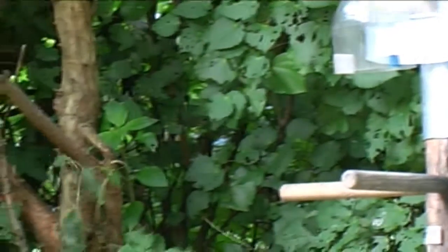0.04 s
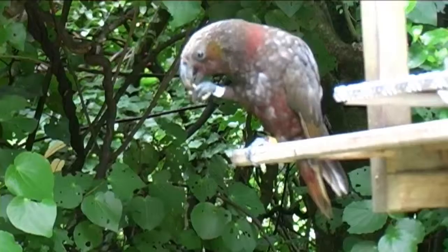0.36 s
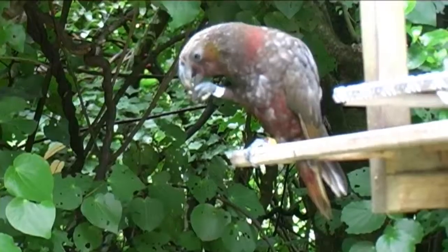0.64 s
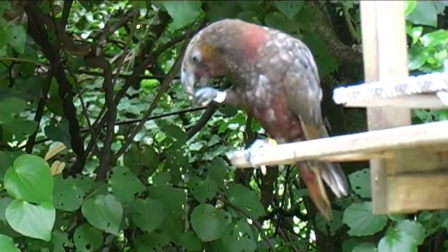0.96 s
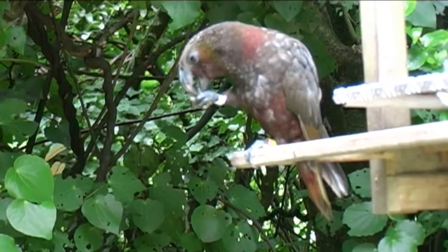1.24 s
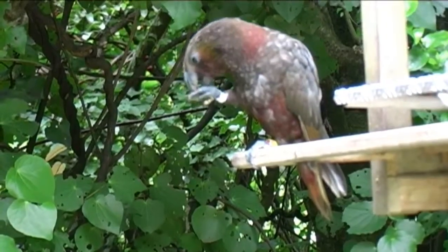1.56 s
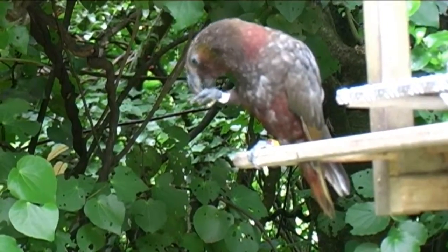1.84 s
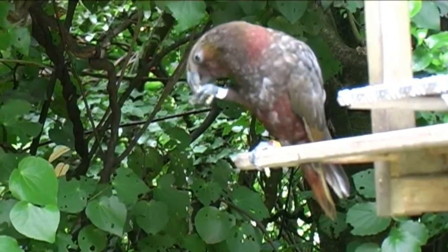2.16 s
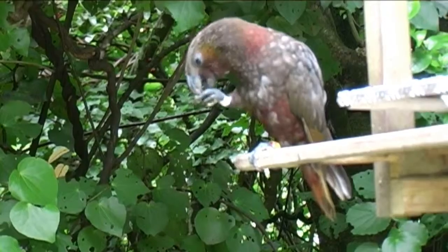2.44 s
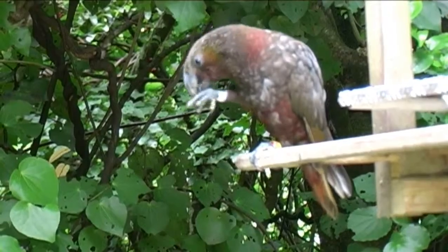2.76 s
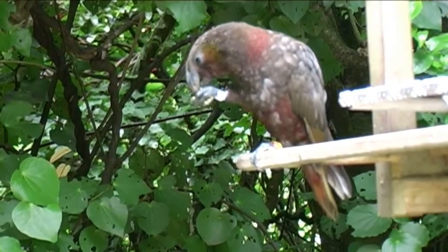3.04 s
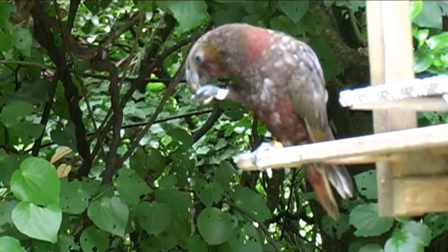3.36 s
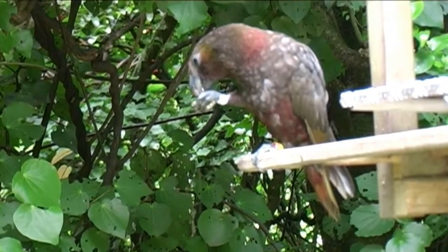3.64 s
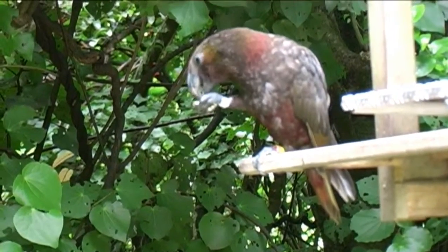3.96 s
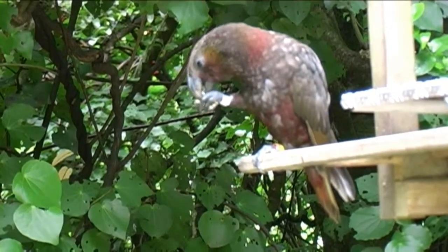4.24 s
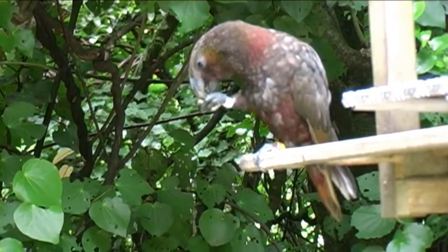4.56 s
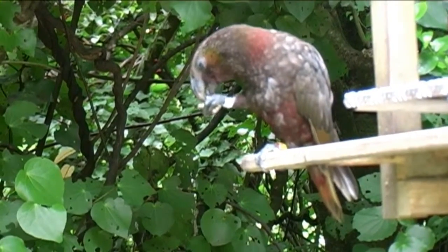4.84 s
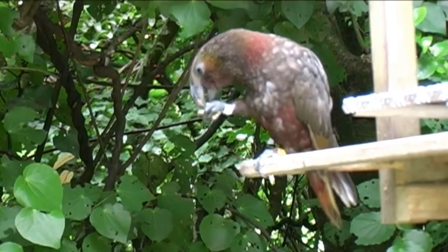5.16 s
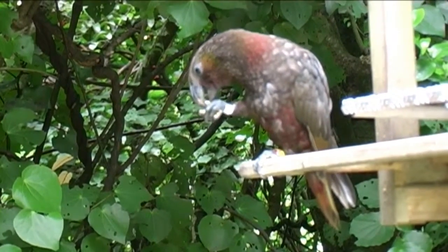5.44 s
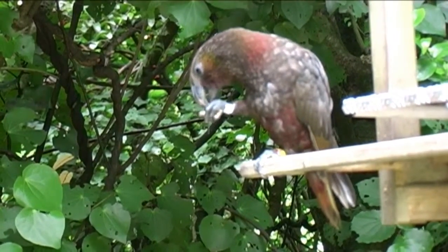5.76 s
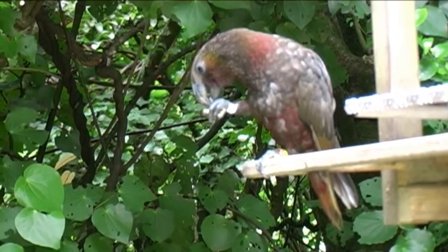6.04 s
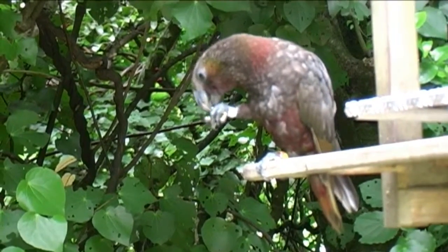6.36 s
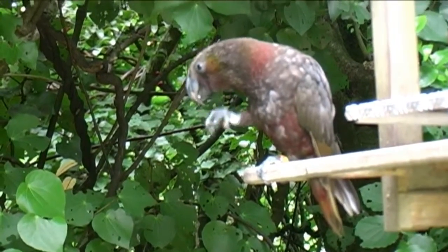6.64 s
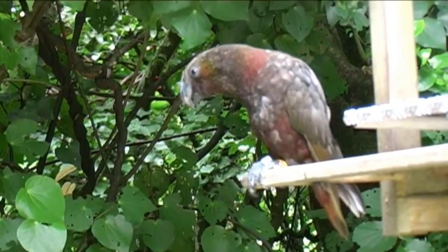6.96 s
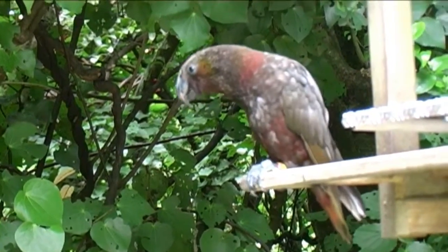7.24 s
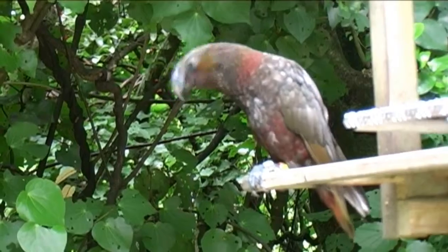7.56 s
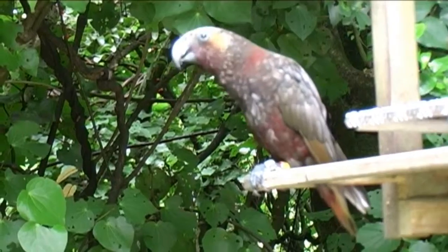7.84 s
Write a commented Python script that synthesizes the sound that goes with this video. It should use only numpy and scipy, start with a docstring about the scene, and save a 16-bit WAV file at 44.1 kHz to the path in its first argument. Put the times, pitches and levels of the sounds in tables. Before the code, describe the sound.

A camera zoom motor buzzes briefly and stops with a small knock. Straight ahead, a parrot nibbles food with scattered dry cracks and tiny ticks. Another bird, to the right, clacks its beak in two evenly paced runs, then gives seven short, loud rasps near the end. Small birds chirp faintly farther off in the dense bush, over the microphone's steady hiss and low hum.

```python
"""Parrot feeding in dense bush

A parrot nibbles food on a feeder; each small dry crack is an impulse that rings its beak.
A hidden bird to the right clacks in two runs, then gives seven loud rasps, pulses of tone and air
shaped by its throat. Others chirp farther off, and leaves and trunks scatter all the birds' sounds.
A camera's zoom motor buzzes at first, and the camera hums and hisses throughout."""
import sys
import numpy as np
from scipy import signal
from scipy.fft import rfft, irfft, next_fast_len
from scipy.io import wavfile
from scipy.ndimage import uniform_filter1d

SR = 44100
rng = np.random.default_rng(int(sys.argv[2]) if len(sys.argv) > 2 else 0)


def int16_out(signal):
    """Quantize to a 16-bit WAV file."""
    q = np.round(np.clip(np.atleast_2d(signal).T, -1, 1) * 32767)
    wavfile.write(sys.argv[1], SR, q.astype(np.int16))


N = 352844
TIME = np.arange(N) / SR

# Spectrum of outdoor air and microphone hiss. Each row: frequency in Hz, relative density in dB.
AIR_COLOUR = [(15, -55), (25, -50), (43, -7.5), (76, -7), (123, -14.5), (153, -6.5), (175, -5.5), (293, -8),
              (516, -10), (887, -11.5), (2110, -18), (4870, -23.5), (10100, -33), (14800, -19),
              (16000, -37)]
# Stereo width of that noise. Each row: frequency in Hz, side minus mid level in dB.
AIR_WIDTH = [(40,-6),(100,-6),(160,-4),(300,-9.5),(1000,-3),(4000,-1),(9000,-5.5),(12000,-1.5),(14000,5.5)]
# Camera hum. Each row: frequency in Hz, mid level in dB, side level in dB.
HUM_TONES = [(113,-62.5,-81),(149.4,-54.5,-43)]
# The zoom motor's hum, overtones and gear tones. Each row: frequency in Hz, level in dB.
ZOOM_TONES = [(85.6,-38),(112.5,-49),(171,-50),(258,-53),(342,-52.5),(540,-62),(750,-55.5),(4300,-61),(4630,-66),(5300,-66),(6230,-67.5)]
# Spectrum of the motor's whirr. Each row: frequency in Hz, relative density in dB.
WHIRR_COLOUR = [(60,-19),(300,0),(800,-3.5),(1600,-8.5),(3000,-9.5),(4500,-23),(6000,-16),(9000,-32),(11500,-20),(13000,-4),(16000,-30)]

# Short arched yelps. Each row: start in seconds, mid-call pitch in Hz, relative level in dB, blur in Hz.
FAR_YELPS = [(.443,1395,-43.5,10),(2.03,1540,-44,290),(2.171,1664,-50,270),(2.783,1494,-47,99),(2.92,1586,-49.5,180)]
# Hoarse churrs. Each row: start and length in seconds, pitch in Hz, relative level in dB.
FAR_CHURRS = [(0.329,0.047,2064,-44),(4.886,.15,2487,-47.2),(5.039,0.089,2500,-50),(5.58,.13,1695,-53.5),(6.417,0.061,1903,-46)]
# Hoarse down-slurs. Each row: start in seconds, first pitch in Hz, relative level in dB, fade in dB/s.
FAR_SLURS = [(.95,4480,-49,14),(4.26,4450,-48,37)]
# Clear glides. Each row: start and length in seconds, first and last pitch in Hz, relative level in dB.
FAR_WHISTLES = [(2.735,0.15,3750,3740,-49.5),(2.827,.14,4120,3760,-52),(5.08,0.047,2970,3420,-50),(5.699,.17,3730,3600,-55),(5.788,.083,3430,2930,-51),(6.162,0.027,2460,2540,-48),(7.951,0.069,2450,1147,-28.5)]
# Upward flicks of a small bird's warble. Each row: time in seconds, top pitch in Hz.
WARBLE_FLICKS = [(2.68,5480),(2.722,5720),(2.769,5500),(2.822,5450)]

# The hidden bird's clacks. Each row: start in seconds, relative level in dB, resonance in Hz.
BEAK_CLACKS = [(.8986,-11,1780),(1.0977,-18,1660),(1.2912,-17,3900),(1.4885,-16.5,5020),(1.6822,-12,5600),(3.653,-12,3950),(3.8484,-18.5,2240),(4.0475,-10.5,1980),(4.2499,-10.5,4420),(4.4546,-18.5,2030),(4.653,-18.5,4730),(7.6114,-21,6540),(7.6485,-17.5,3310),(7.6574,-29,3950),(7.7645,-22,3460),(7.9862,-14.5,6100)]
# Response of its beak. Each row: frequency in Hz, gain in dB.
HIDDEN_BEAK = [(200,-28),(900,-6),(1800,-2),(2700,-1),(4100,2),(5000,0),(6900,2),(8200,-4.5),(10000,-9),(12500,-21),(16000,-41.5)]
# Its rasps. Each row: hiss start, burst start and burst length in seconds, effort in dB,
# mid-burst pitch in Hz, sag in octaves per second, resonance in Hz.
RASP_CALLS = [(6.647,6.6532,0.015,-23,1165,3.6,2260),(6.814,6.825,.02,-20,1276,2.84,2290),(6.983,7.002,.022,-20.5,1046,3.4,3150),(7.163,7.18,.011,-11.5,1031,20,4350),(7.333,7.354,.022,-14.5,1589,7,4440),(7.5047,7.5348,0.0065,-10,1055,3.5,4200),(7.6947,7.718,0.01,-12.2,1014,3.5,3330)]
# Response of its throat. Each row: frequency in Hz, gain in dB.
THROAT_COLOUR = [(300,-42),(650,-10.5),(950,-7),(1500,-3),(2100,1.5),(3100,3),(4200,5),(5200,3),(6300,0.5),(7500,-3),(8600,-8.5),(10000,-19.5),(12000,-19),(15000,-47)]
# Spectrum of the hiss that opens a rasp. Each row: frequency in Hz, relative density in dB.
LEAD_HISS_COLOUR = [(400,-22.5),(1400,-23),(2100,-9.5),(3300,-5),(4500,-3.5),(5500,-5),(7300,-19),(10000,-25),(14000,-38)]
# Wheezes ending the last two rasps. Each row: start and time until fading in seconds, relative level in dB.
END_WHEEZES = [(7.587,.075,-36.5),(7.746,0.031,-30)]

# The parrot cracks its food. Each row: start in seconds, relative level in dB, resonance in Hz.
FOOD_CRACKS = [(.6148,-23.5,4800),(.7095,-23.5,7100),(1.172,-28,7500),(2.1516,-18,6940),(2.3675,-28.5,6500),(3.0792,-13,1180),(3.1557,-28,4530),(3.1952,-18,6940),(4.9761,-25,5200),(5.9612,-25.5,3380),(6.1924,-21,8100),(6.2722,-23,2900),(6.5099,-20,7500)]
# Response of the parrot's beak. Each row: frequency in Hz, gain in dB.
PARROT_BEAK = [(100,-47),(600,-4.5),(1200,-7.5),(2400,-7.5),(4600,-2),(7000,-4.5),(8200,-7.5),(11000,-14),(16000,-20)]


def amp(db):
    """Amplitude grows tenfold for every 20 dB."""
    return 10 ** (np.asarray(db) / 20)


def unit(x):
    """Normalisation to an rms of 1."""
    return x / np.sqrt(np.mean(x ** 2) + 1e-20)


def read(points, hz):
    """Interpolation of a spectrum on a log-frequency axis."""
    f, value = np.transpose(points)
    return np.interp(np.log(hz + 1), np.log(f + 1), value)


def add(mix, s, sound):
    """Superposition: a sound joins the mix at s seconds."""
    part = mix[max(round(s * SR), 0):][:len(sound)]
    part += sound[:len(part)]


def tint(x, points):
    """Filtering by multiplication in the frequency domain."""
    size = next_fast_len(len(x))
    gain = amp(read(points, np.fft.rfftfreq(size, 1 / SR)))
    return irfft(rfft(x, size) * gain, size)[:len(x)]


def noise(points):
    """Stationary Gaussian noise of rms 1 with the given spectrum."""
    return unit(tint(rng.standard_normal(N), points))


def drift(count):
    """Random modulation of about unit size, interpolated between count values."""
    return np.interp(TIME, np.linspace(0, TIME[-1], count), rng.standard_normal(count))


def ring(colour_db, size=1024):
    """Minimum-phase impulse response of a body, from its gain in dB as a function of frequency."""
    log_gain = np.log(amp(colour_db(abs(np.fft.fftfreq(size, 1 / SR)))))
    spectrum = np.exp(np.conj(signal.hilbert(log_gain)))
    return np.fft.ifft(spectrum).real[:size // 2]


def place(x, right_db):
    """Direction by level difference: the right channel gains right_db over the left."""
    gains = amp([[-right_db / 2], [right_db / 2]])
    return x * gains / gains.mean()


def air_and_hum(air_db=-47.07, right_db=1.34, waver_rad=0.16):
    """Broadband air and hiss underlie the camera's hum, which is mostly in antiphase between channels."""
    mid = amp(air_db) * noise(AIR_COLOUR)
    side = amp(air_db) * tint(noise(AIR_COLOUR), AIR_WIDTH)
    for hz, mid_db, side_db in HUM_TONES:
        phase = 2 * np.pi * hz * TIME + waver_rad * drift(count=60)
        mid += np.sqrt(2) * amp(mid_db) * np.sin(phase)
        side += np.sqrt(2) * amp(side_db) * np.cos(phase)
    return place(mid, right_db) + place(side, right_db) * [[1], [-1]]


def zoom_motor(stop_s=.338, whirr_db=-45, knock_db=-37, knock_t60=0.079):
    """Rotating motor and gears give a wavering line spectrum; the stop excites damped modes, a knock."""
    buzz = np.zeros(N)
    for hz, db in ZOOM_TONES:
        waver = .04 * hz / (hz + 800)  # higher tones waver by a larger share of their pitch
        turns = np.cumsum(hz * (1 + waver * drift(count=400))) / SR
        chatter_db = 6 * hz / (hz + 500) * drift(count=700)  # the high gear tones come and go
        buzz += np.sqrt(2) * amp(db + chatter_db) * np.sin(2 * np.pi * turns)
    running = np.clip((stop_s - TIME) / 0.01, 0, 1)
    t = np.maximum(TIME - (stop_s - .006), 0)
    modes = sum(np.sin(2 * np.pi * hz * t) for hz in (200, 430, 577, 1160, 1420))
    knock = amp(knock_db - 60 * t / knock_t60) * modes
    whirr = amp(whirr_db) * np.array([noise(WHIRR_COLOUR), noise(WHIRR_COLOUR)])
    return place((buzz + whirr) * running + knock, right_db=1.8)


def bush(x, gap_s=0.0024, near_t60=0.15, far_t60=0.6, far_db=-17, dull_hz=8000, coherence=0.63):
    """Scattering by leaves and trunks gives a dense early echo and a faint, duller, longer tail."""
    out, t = np.zeros((2, N)), np.arange(SR * 2 // 3) / SR
    lowpass = signal.butter(2, dull_hz, fs=SR, output="sos")
    for k in range(3):  # three sets of echo paths crossfade, as when the birds move their heads
        left, other = rng.standard_normal((2, len(t))) * (rng.random((2, len(t))) < .3)
        right = coherence * left + np.sqrt(1 - coherence ** 2) * other
        taps = np.array([left, right]) * (t > gap_s)
        echo = taps * amp(-60 * t / near_t60)
        echo += signal.sosfilt(lowpass, taps) * amp(far_db - 60 * t / far_t60)
        echo /= np.linalg.norm(echo, axis=1, keepdims=True)
        share = np.sqrt(2 / 3) * np.cos(np.pi * (1.8 * TIME + k / 3))
        out += signal.fftconvolve((x * share)[None], echo, axes=1)[:, :N]
    return out


def whistle(pitch_hz, blur_hz, taper=0.41):
    """Random frequency modulation broadens a gliding tone and makes it hoarse."""
    flutter = unit(uniform_filter1d(rng.standard_normal(len(pitch_hz)), size=36))
    turns = np.cumsum(pitch_hz + blur_hz * flutter) / SR
    return np.sqrt(2) * np.sin(2 * np.pi * turns) * signal.windows.tukey(len(pitch_hz), taper)


def warble(start_s, length_s=0.193, rest_hz=4040, rise_s=.0035, fall_s=.012):
    """Frequency modulation of one unbroken tone: it flicks up four times and relaxes exponentially."""
    t = start_s + np.arange(int(length_s * SR)) / SR
    lift_hz = sum((top_hz - rest_hz) * np.exp(-np.maximum((s - t) / rise_s, (t - s) / fall_s))
                  for s, top_hz in WARBLE_FLICKS)
    return whistle(rest_hz + lift_hz, blur_hz=20, taper=0.27)


def far_birds(yelp_s=.054, slur_s=0.43, sag_hz_per_s=1800, warble_start_s=2.672):
    """Pitch contour sets each call apart: yelps arch, churrs rise, slurs sag and whistles glide."""
    out = np.zeros(N)
    for s, hz, db, blur_hz in FAR_YELPS:
        u = np.linspace(-1, 1, int(yelp_s * SR))
        arch = 1 - 0.252 * u ** 2 - 0.062 * u  # low at both ends, lowest at the last
        add(out, s, amp(db) * whistle(hz * arch, blur_hz))
    for s, length, hz, db in FAR_CHURRS:
        rise = 1 + .12 * np.linspace(-.5, .5, int(length * SR))
        add(out, s, amp(db) * whistle(hz * rise, blur_hz=0.238 * hz))
    for s, hz, db, fade in FAR_SLURS:
        t = np.arange(int(slur_s * SR)) / SR
        add(out, s, amp(db - fade * t) * whistle(hz - sag_hz_per_s * t, blur_hz=300, taper=0.31))
    for s, length, first_hz, last_hz, db in FAR_WHISTLES:
        glide_hz = np.geomspace(first_hz, last_hz, int(length * SR))
        add(out, s, amp(db) * whistle(glide_hz, blur_hz=65))
    add(out, warble_start_s, amp(-45.5) * warble(warble_start_s))
    return out


def snap(colour, hz, boost_db, width_hz, hollow_db=0, spacing_hz=1300):
    """Impulse response of a beak, a short tube with evenly spaced resonances, one dominant; peak 1."""
    tube = lambda f: hollow_db * np.cos(2 * np.pi * (f - hz) / spacing_hz)
    body = ring(lambda f: read(colour, f) + tube(f) + boost_db / (1 + ((f - hz) / width_hz) ** 2))
    return body / abs(body).max()


def beak_clicks(rows, colour, boost_db, width_hz, spacing_hz, bounce, bounce_s):
    """Impact excitation: each impulse rings the beak and chatters briefly."""
    out = np.zeros(N)
    for s, db, hz in rows:
        peak_db = boost_db - 3 * np.log2(hz / 3000)  # lower resonances stand out more
        click = snap(colour, hz, peak_db, width_hz, hollow_db=0.5, spacing_hz=spacing_hz)
        click = np.pad(click, (0, 512))
        for gap_s in bounce_s * rng.uniform(.4, 1.6, 2):
            chatter = np.r_[1, np.zeros(int(gap_s * SR)), bounce]
            click = signal.lfilter(chatter[::-1], chatter, click)  # all-pass: longer, same colour
        add(out, s, amp(db) * click)
    return out


def wheezes(rise_s=0.024, fade_db_per_s=302, uneven_db=4.0):
    """Unvoiced airflow, filtered by the hidden bird's throat, swells, holds and dies away."""
    flow = np.zeros(N)
    for s, hold_s, db in END_WHEEZES:
        swell = np.clip((TIME - s) / rise_s, 0, 1)
        flow += swell * amp(db - fade_db_per_s * np.maximum(TIME - s - hold_s, 0))
    return flow * unit(noise(THROAT_COLOUR) * amp(uneven_db * drift(count=4000)))


def rasps(rise_s=0.003, fall_s=0.008, boost_db=4, width_hz=550, lead_fall_s=0.0047, uneven_db=3.5):
    """Source and filter: after a leading hiss, rough pulses of sagging pitch excite the throat."""
    out, t = np.zeros(N), np.arange(SR // 10) / SR
    lead_hiss = unit(noise(LEAD_HISS_COLOUR) * amp(uneven_db * drift(count=8000)))
    for hiss_s, burst_s, length, effort_db, pitch_hz, sag, peak_hz in RASP_CALLS:
        lead_db = min(effort_db - 12.5, -26)  # the hiss follows the effort up to a ceiling
        lead = (TIME >= hiss_s) * np.exp(-np.maximum(TIME - burst_s, 0) / lead_fall_s)
        out += amp(lead_db) * lead * lead_hiss
        flutter, hiss, strength = rng.standard_normal((3, len(t)))
        wobble = .02 * unit(uniform_filter1d(flutter, size=60))
        glide = 2 ** (-sag * (t - length / 2))
        turns = np.cumsum(pitch_hz * (glide + wobble)) / SR
        pulses = unit(sum(np.cos(2 * np.pi * k * turns) for k in range(1, 14)))
        pulses *= amp(uneven_db * strength[np.round(turns).astype(int)])  # cycles vary in strength
        puffs = unit(hiss * (0.12 + np.exp(-(turns % 1) / 0.38)))  # air escapes once a cycle
        rough = np.clip(0.58 - .028 * (effort_db + 16), 0, 1)  # a harder call has a clearer voice
        throat = ring(lambda f: read(THROAT_COLOUR, f) + boost_db / (1 + ((f - peak_hz) / width_hz) ** 2))
        voice = np.convolve((1 - rough) * pulses + rough * puffs, throat)[:len(t)]
        push = np.minimum(t / rise_s, 1) * np.exp(-np.maximum(t - length, 0) / fall_s)
        add(out, burst_s - rise_s / 2, amp(effort_db) * push * unit(voice))
    return out


def crumbs(per_s=9, db=-42, spread_db=3):
    """A Poisson process of tiny ticks as the parrot's beak works the food."""
    sizes = amp(db + spread_db * np.minimum(rng.exponential(1, N), 3))
    impulses = sizes * (rng.random(N) < per_s / SR)
    return signal.oaconvolve(impulses, snap(PARROT_BEAK, hz=6000, boost_db=2.5, width_hz=2300))[:N]


def scene():
    """Direct and scattered sound add: the parrot is ahead, the hidden bird to the right among leaves."""
    cracks = beak_clicks(FOOD_CRACKS, PARROT_BEAK, boost_db=9, width_hz=180, spacing_hz=2800,
                         bounce=0.75, bounce_s=0.00025)
    parrot = cracks + crumbs()
    clacks = beak_clicks(BEAK_CLACKS, HIDDEN_BEAK, boost_db=9.5, width_hz=250, spacing_hz=1300,
                         bounce=0.71, bounce_s=.0004)
    calls, birds = rasps() + wheezes(), far_birds()
    direct = (place(parrot, right_db=.5) + place(clacks, right_db=20)
              + place(calls, right_db=4.5) + amp(-2) * place(birds, right_db=2))
    scattered = amp(-3) * parrot + amp(0.5) * clacks + amp(-4.5) * calls + amp(-5.5) * birds
    return direct + place(bush(scattered), right_db=2.0) + air_and_hum() + zoom_motor()


def record(dry):
    """Amplitude and band limiting: any peak beyond full scale clips, then a low-pass cuts at 16 kHz."""
    lowpass = signal.firwin(511, 16000, window=("kaiser", 9), fs=SR)
    return signal.oaconvolve(np.clip(dry, -1, 1), lowpass[None], "same")


dry = scene()
out = record(dry)
int16_out(out)
```